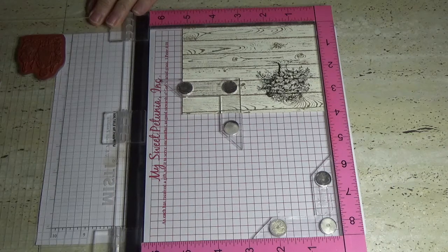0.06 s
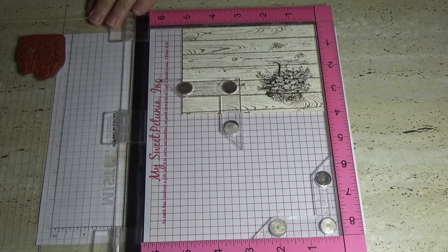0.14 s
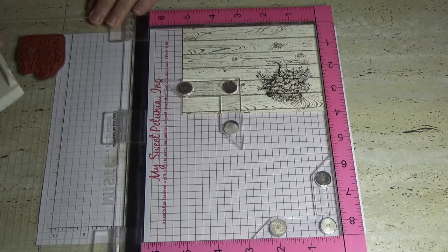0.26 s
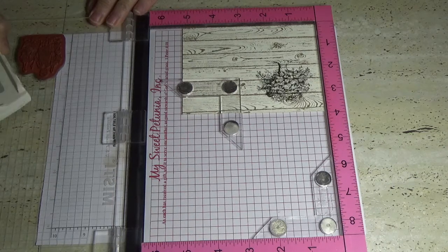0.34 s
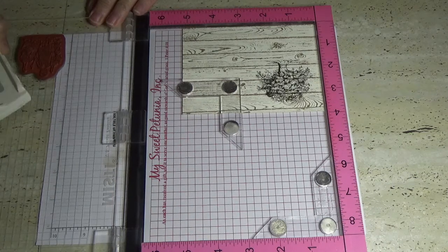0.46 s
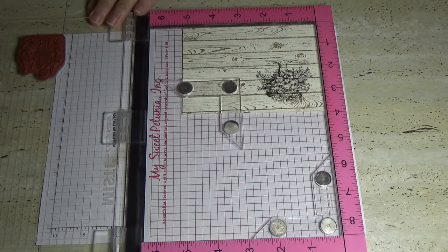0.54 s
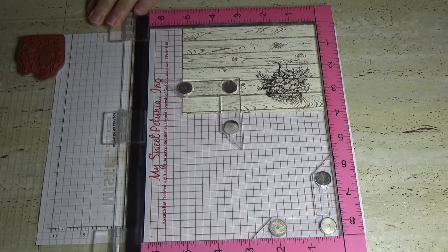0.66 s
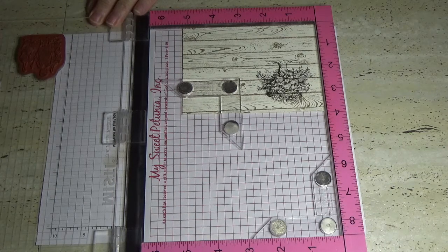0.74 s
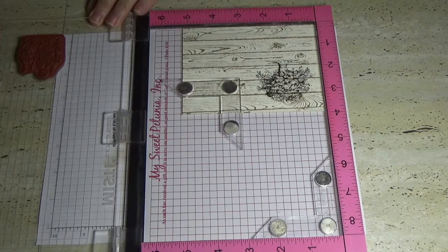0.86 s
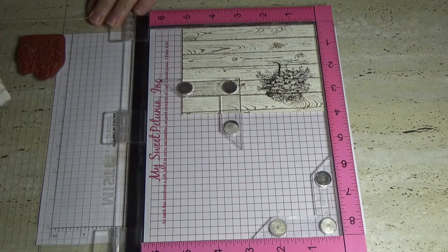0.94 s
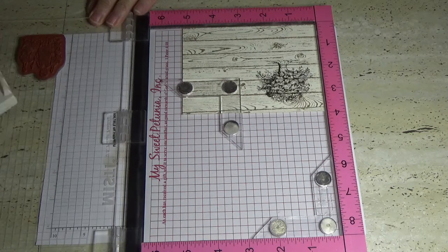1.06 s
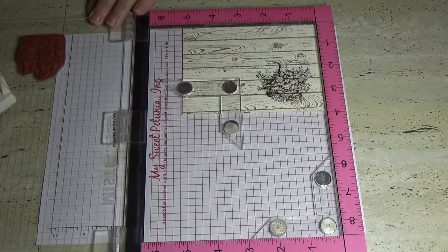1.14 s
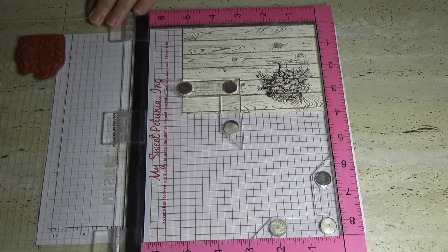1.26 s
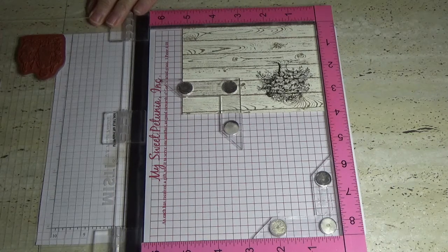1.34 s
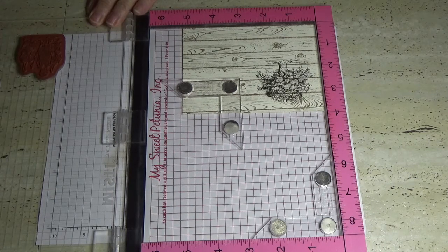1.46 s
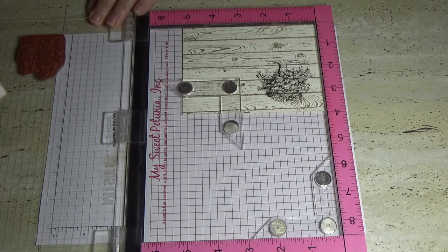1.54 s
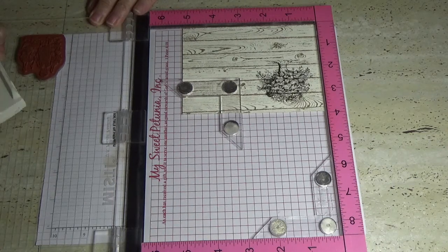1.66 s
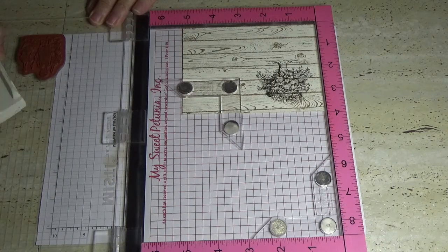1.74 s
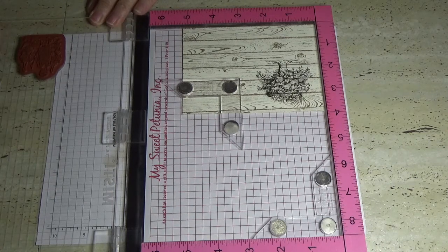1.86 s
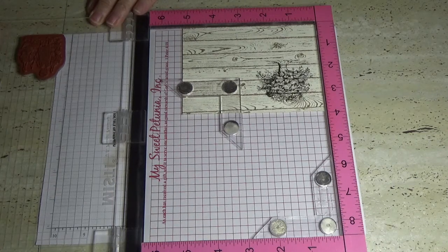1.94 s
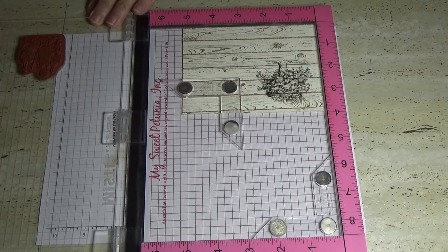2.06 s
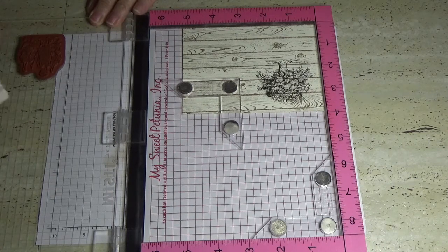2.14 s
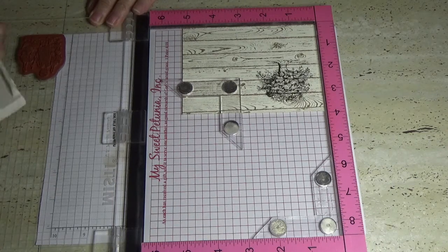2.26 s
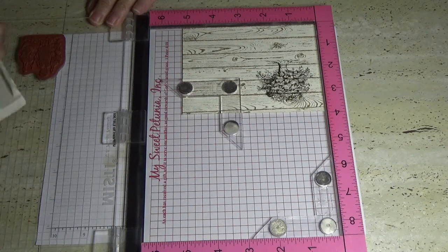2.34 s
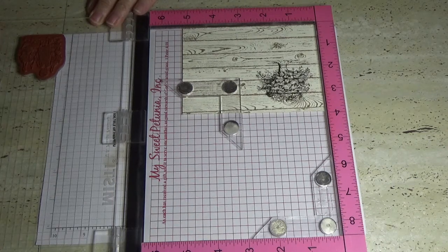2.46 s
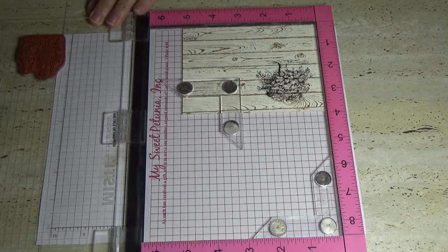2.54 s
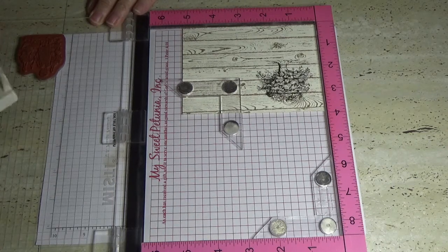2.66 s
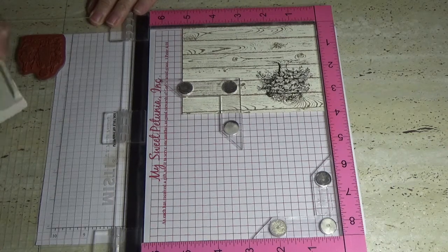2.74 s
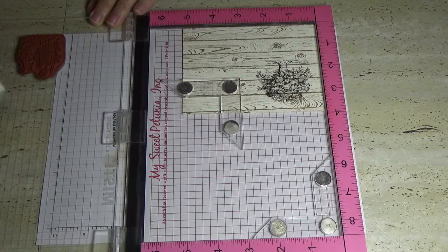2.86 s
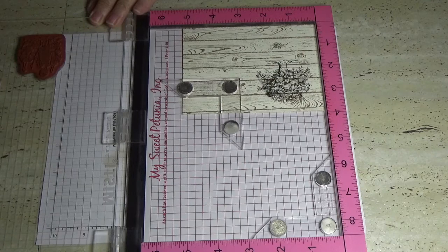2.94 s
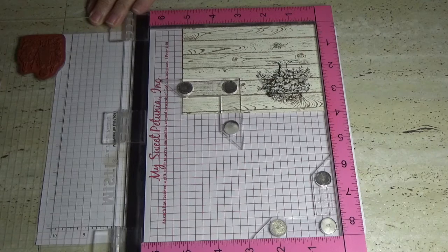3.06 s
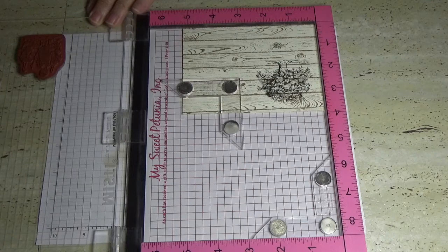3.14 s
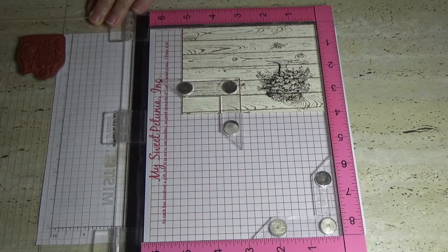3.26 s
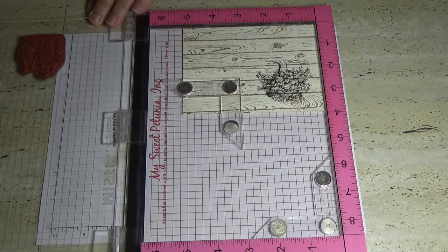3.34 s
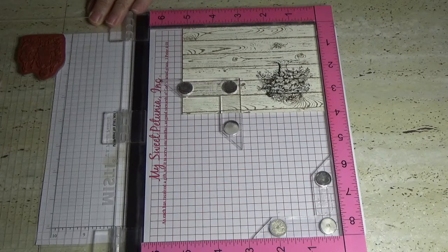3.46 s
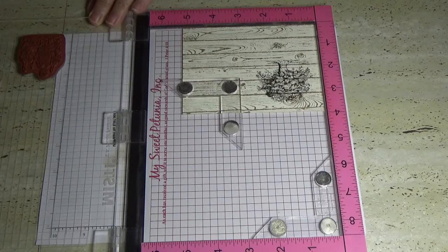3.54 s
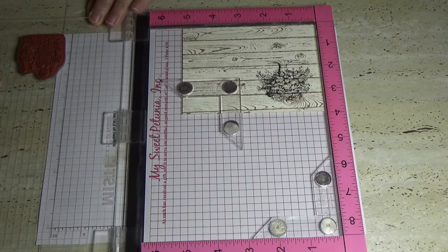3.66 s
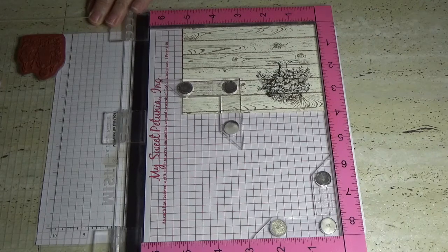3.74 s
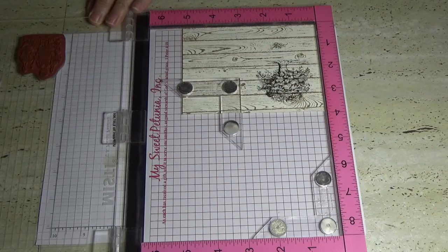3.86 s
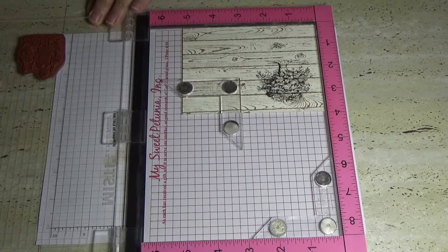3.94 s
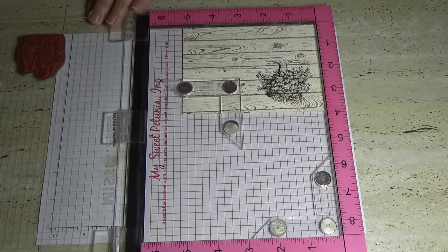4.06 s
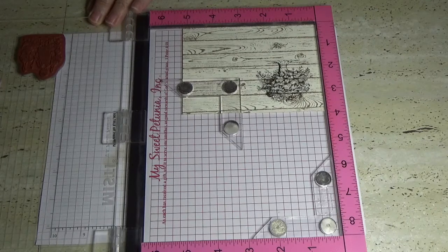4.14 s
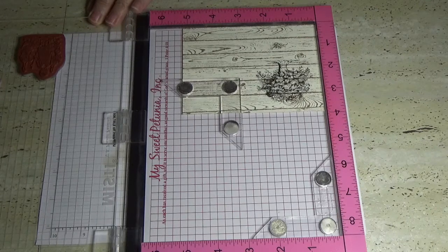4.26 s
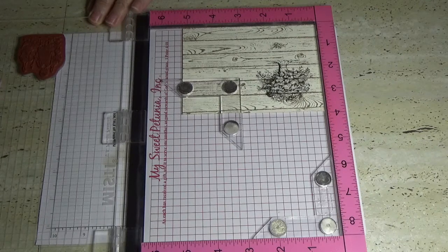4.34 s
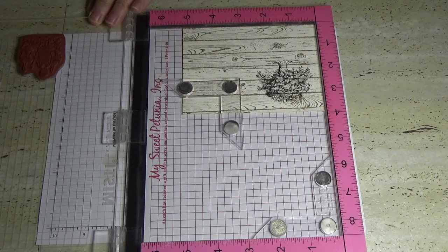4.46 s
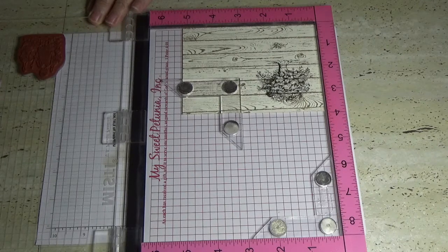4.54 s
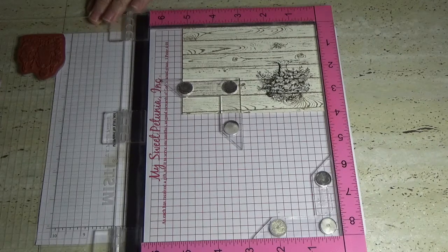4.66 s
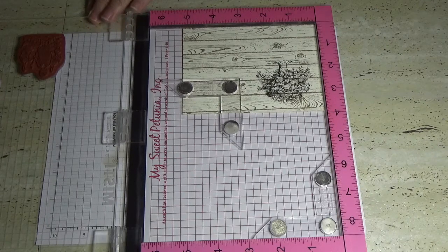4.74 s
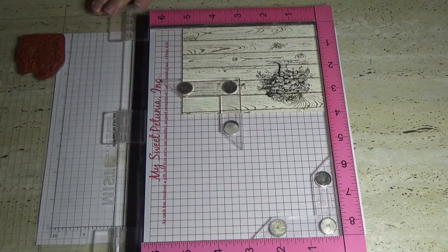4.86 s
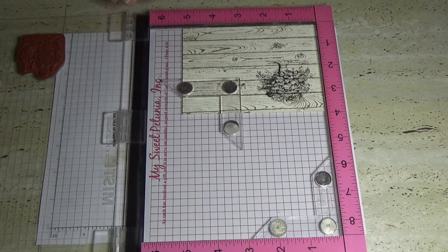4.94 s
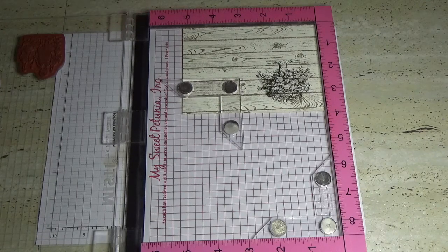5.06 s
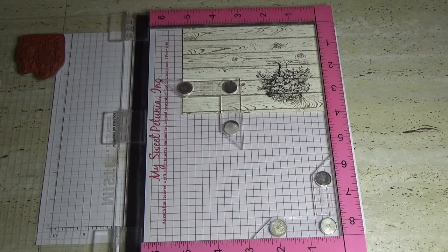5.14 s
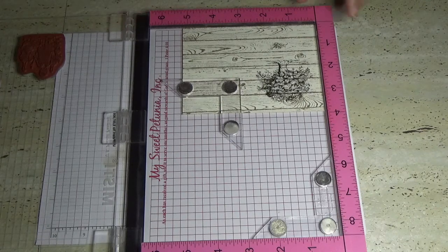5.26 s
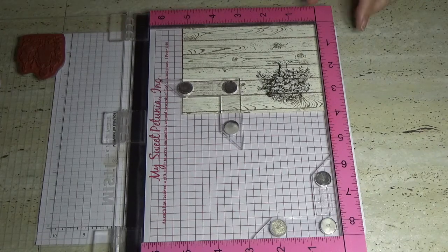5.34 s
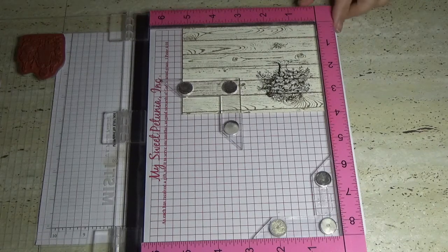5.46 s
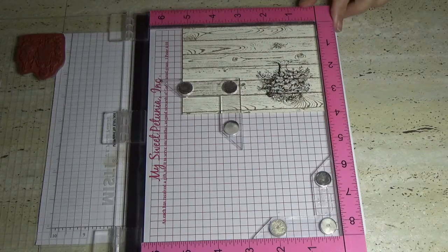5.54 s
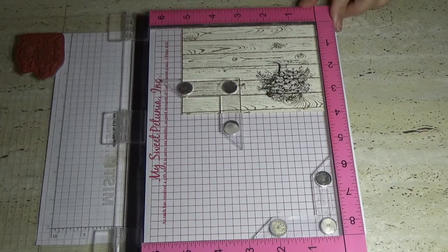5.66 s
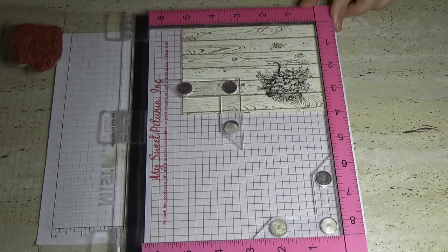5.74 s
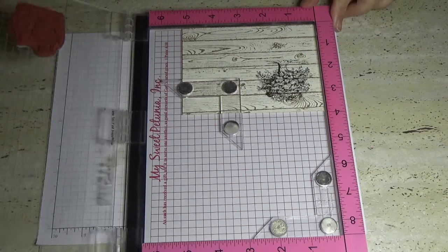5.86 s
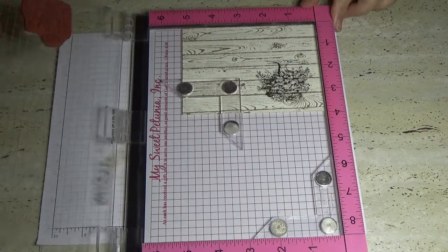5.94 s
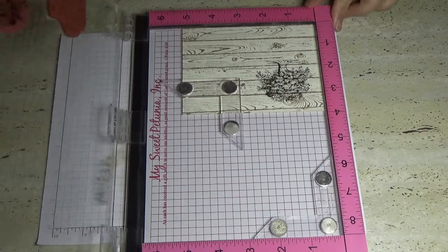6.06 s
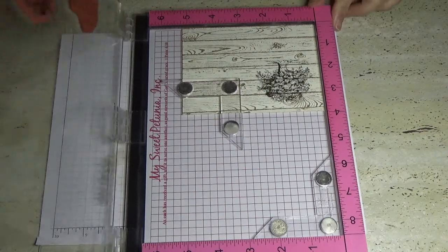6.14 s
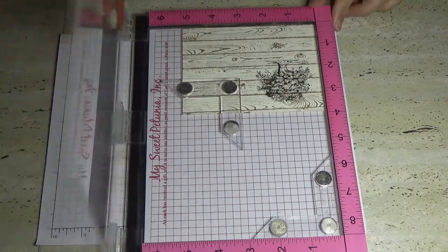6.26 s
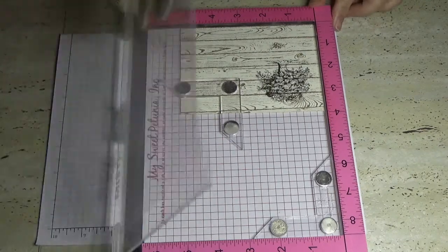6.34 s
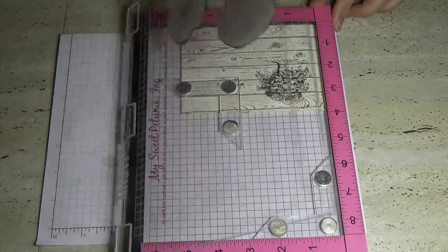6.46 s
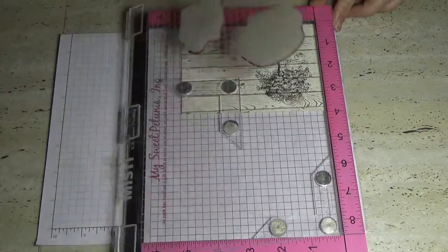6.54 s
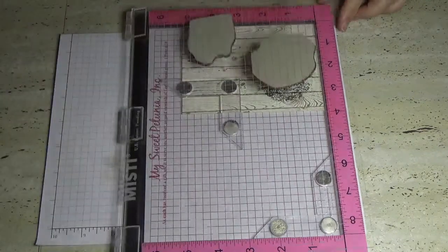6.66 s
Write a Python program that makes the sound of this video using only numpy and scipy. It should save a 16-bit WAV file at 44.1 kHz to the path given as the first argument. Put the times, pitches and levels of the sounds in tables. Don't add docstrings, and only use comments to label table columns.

```python
import sys
import numpy as np
from scipy import signal
from scipy.io import wavfile

SR = 44100
rng = np.random.default_rng(int(sys.argv[2]) if len(sys.argv) > 2 else 0)


def invert_db(level):
    return 10 ** (np.asarray(level, dtype=float) / 20)


def transcribe(u):
    v = np.clip(np.atleast_2d(u).T, -1, 1)
    q = np.round(v * 32767).astype(np.int16)
    wavfile.write(sys.argv[1], SR, q)


N = 295911

# t/s, peak level/dB, hollow f/Hz, case level/dB and crack level/dB (both re peak)
SLAPS = [
    (0.345, -19, 1053, 5, 8.5),
    (1.003, -19, 957, 10, 6),
    (1.633, -12.5, 1038, -11, 1.5),
    (2.225, -15, 1087, 5, 6.5),
    (2.731, -16.5, 1030, 5, 5.5),
]
PULLS = [
    (0.518, -21, 1166, 0.5, -2),
    (1.165, -23.5, 1100, -3, -1.5),
    (1.809, -19, 1110, -3.5, -5),
    (2.389, -35, 1050, -17, -22),
    (2.398, -27.5, 1184, -6.5, -7),
    (2.828, -26.5, 1074, 1.5, -2),
    (3.421, -23, 837, -13, -8.5),
]
DROPS = [
    (0.693, -36.5, 1337, 1.8, -1),
    (1.391, -35.5, 1333, 1.5, -2.5),
]
# f/Hz, level/dB, t60/s
CASE_MODES = [(1890, -6.5, 0.0031), (2830, -6, 0.0053)]
# f/Hz, level/dB, t60/s
RIM_MODES = [(3450, 73, 0.0038), (4450, -16, 0.014), (5100, -43, 0.0052)]


def pad():
    body, bright, spread = np.zeros((3, N))
    kinds = [(SLAPS, -14, -13.5), (PULLS, -74, -15.6), (DROPS, -15.5, -13.5)]
    for blows, thud_db, squeeze_db in kinds:
        for s, db, hollow_hz, case_db, crack_db in blows:
            touch = contact(click=14.0, rise_s=.0007, spread_s=.0012)
            slap = contact(click=2.5, rise_s=.0007, spread_s=.0035)
            scatter_db = rng.normal(0, 2.5, 6)
            top_hz = np.clip(6500 * invert_db(0.41 * (db + crack_db + 21.5)), 5200, 11000)

            blow = struck_body(touch, hollow_hz, case_db, thud_db, scatter_db[:2])
            add(body, s, invert_db(db + 2.5) * soft(blow, top_hz))
            add(body, s - .005, invert_db(db + squeeze_db) * squeezed_air(hollow_hz))

            rim = invert_db(-8) * peak_one(ring(touch, RIM_MODES, scatter_db[3:]))
            rough = crack(slap, low_hz=2400, high_hz=top_hz) + rim
            even = crack(touch, low_hz=2400, high_hz=top_hz) + rim
            add(bright, s, invert_db(db + crack_db - 2.0) * rough)
            add(spread, s, invert_db(db + crack_db - 2.5) * rms_one(even) * np.std(rough))
    return body, bright, spread


def struck_body(touch, hollow_hz, case_db, thud_db, scatter_db):
    hollow = [(0.56 * hollow_hz, -6, .011), (hollow_hz, 0, .022), (1.704 * hollow_hz, -7, .008)]
    clear_hz = 2405 * max(hollow_hz / 1050, 1) ** 0.16
    thud = [(257, 0.5, 0.0078), (348, -5.5, 0.04), (612, -19.5, 0.048)]
    blow = peak_one(ring(touch, hollow))
    blow += invert_db(-4) * peak_one(ring(touch, CASE_MODES, scatter_db))
    blow += invert_db(case_db - 6.0) * peak_one(ring(touch, [(clear_hz, 0, 0.016)]))
    blow += invert_db(thud_db) * peak_one(ring(touch, thud))
    return blow


def squeezed_air(hollow_hz):
    flow = rng.standard_normal(220) * np.linspace(0, 1, 220)
    return peak_one(ring(flow, [(hollow_hz, 0, .006), (3.3 * hollow_hz, -4, .003)]))


# t/s, peak level/dB of the low pair, level/dB of the upper pair (re low)
BOOMS = [
    (0.346, -46, 4),
    (1.005, -43, 3.5),
    (1.632, -36.5, -3),
    (2.224, -41, -11),
    (2.733, -36.5, 5),
    (4.579, -57.5, 4.5),
    (5.15, -57.5, 13),
    (5.374, -63.5, 8),
]
# f/Hz, level/dB, t60/s
TABLE_LOW_MODES = [(58, 0, .5), (70, -1, .45)]
# f/Hz, level/dB, t60/s
TABLE_UPPER_MODES = [(136, 0, .22), (150, -3, .22)]


def table():
    out, push = np.zeros(N), np.zeros(SR)
    push[:200] = np.hanning(200) / 100
    for s, db, upper_db in BOOMS:
        low = ring(push, TABLE_LOW_MODES)
        upper = invert_db(upper_db + 4.0) * ring(push, TABLE_UPPER_MODES)
        add(out, s, invert_db(db - 1.5) * (low + upper))
    return out


# start t/s, slip rate f/Hz at start, at end, level/dB at start, at end
SLIPS = [
    (5.9270, 400, 340, -38, -41),
    (5.9576, 193, 192, -32, -32),
    (6.0302, 192, 190, -32, -38),
    (6.0896, 125, 228, -30, -33),
    (6.1599, 150, 150, -22, -22),
    (6.1663, 185, 222, -31, -33),
    (6.2048, 360, 520, -39, -41),
    (6.2846, 370, 360, -34, -38),
    (6.336, 330, 300, -42, -49),
]
# t/s, panel load level/dB, pin grip level/dB
SWING = [
    (5.927, -2, 5.5),
    (5.96, 1, 3),
    (6.0, -4.5, -1),
    (6.08, -1.5, -2),
    (6.2, -11, -6),
    (6.25, -4, -10),
    (6.28, -9.5, 1),
    (6.36, 2, -11),
    (6.4, -3, -20),
]
# f/Hz, level/dB, t60/s
HINGE_MODES = [(1110, -23, 0.067), (1870, -11.5, 0.028), (2520, -15, 0.011), (3770, 0, 0.0052),
               (4130, -8.5, 0.027), (4880, 6.5, 0.0033)]
# f/Hz, level/dB, t60/s
PIN_MODES = [(7400, 2, 0.00087), (9800, 11.5, 0.0017)]


def hinge():
    swing_start_s, swing_end_s, catch_s = SLIPS[0][0], 6.387, .002
    slips = np.zeros(N)
    ends_s = [run[0] for run in SLIPS[1:]] + [swing_end_s]
    for (start, rate0, rate1, db0, db1), end in zip(SLIPS, ends_s):
        size = round((end - catch_s - start) * SR)
        uneven = 1 + (rate0 > 300) * 2.0 * rng.standard_normal(size)
        cycles = np.cumsum(np.linspace(rate0, rate1, size) * uneven) / SR
        count = np.maximum.accumulate(np.floor(cycles))
        add(slips, start, np.diff(count, prepend=-1) * np.linspace(invert_db(db0), invert_db(db1), size))
    slips *= invert_db(.8 * rng.standard_normal(N))
    slips += signal.lfilter([.06], [1, -.96], slips) * rng.standard_normal(N)

    load_db, grip_db = in_time(SWING)
    since = np.clip(np.arange(N) / SR, swing_start_s, swing_end_s) - swing_start_s
    panel_hz = np.clip(722 - 1400 * (since - 0.15), 474, 722)
    leaf_hz = 6110 - 2700 * since
    kicks = np.diff(slips, prepend=0)
    metal = ring(slips, HINGE_MODES) + invert_db(grip_db) * ring(slips, PIN_MODES)
    metal += invert_db(-3.0) * gliding(kicks, leaf_hz, t60=0.011)
    panel = invert_db(load_db + 11.5) * gliding(kicks, panel_hz, t60=0.016)
    return invert_db(-5.5) * metal + panel


# t/s, ring peak level/dB, ring
# f/Hz, crack level/dB, thud level/dB
CLICKS = [(3.103, -59, 820, -58, -75), (4, -54.5, 900, -68, -74), (4.58, -34, 860, -93, -56.5),
          (4.6, -53, 860, -87, -50), (4.768, -48, 1310, -41.5, -69), (4.842, -76, 1380, -51.5, -79),
          (5.163, -48, 690, -42, -47), (5.375, -34, 2040, -53.5, -60), (5.579, -69, 762, -49.5, -67),
          (5.679, -44, 1650, -39.5, -79), (5.694, -72, 1160, -45, -73.5), (5.711, -49, 1560, -40, -79),
          (5.72, -37.5, 1640, -49, -58), (6.565, -70, 762, -65, -60), (6.7, -46, 1520, -67, -70),
          (1.36, -52, 1620, -75, -60),
    (2.218, -32, 1080, -55, -53),
    (5.152, -59, 620, -75, -43.5),
    (5.252, -70, 700, -80, -72),
    (5.381, -49, 1000, -50, -54),
    (5.716, -44, 1530, -48, -60),
    (5.73, -53, 1000, -53, -70),
    (6.16, -69, 600, -76, -57),
    (5.956, -42, 630, -80, -61),
]


def clicks():
    body, bright = np.zeros((2, N))
    thud = [(201.0, 2, 0.063), (324.7, -4.5, 0.064), (519.4, 1.5, 0.025)]
    for s, db, hz, crack_db, thud_db in CLICKS:
        low_hz, crack_hz = (4770, 6800) if crack_db - db > 18 else (1760, 4230)
        touch = contact(click=2.2, rise_s=.0002, spread_s=0.0043)
        broad = [(.55 * hz, -4, .012), (hz, 0, .008), (1.6 * hz, -2, .004)]
        add(body, s, invert_db(db + 1.0) * peak_one(soft(ring(touch, broad), top_hz=9.0 * hz)))
        add(body, s, invert_db(thud_db + 4.0) * peak_one(soft(ring(touch, thud), top_hz=1200)))
        brief = touch * np.exp(-np.arange(len(touch)) / SR / 0.006)
        add(bright, s, invert_db(crack_db + 9) * crack(brief, low_hz, high_hz=min(2.02 * crack_hz, 13000)))
    return body, bright, invert_db(-2.5) * bright


# f/Hz, t60/s, level/dB, left-right likeness/1
ROOM = [(140, 0.78, 0, 0.93), (417, 0.27, 3.5, 0.9), (1000, 0.26, 8.5, 0.81), (2470, 0.33, 1, 0.53),
        (5130, 0.37, 2.5, 0.51), (9800, 0.33, 2.5, 0.7)]


def room(x):
    t = np.arange(SR // 2) / SR

    def decay(hz):
        gain = invert_db(at_hz(ROOM, hz, order=2) - 60 * t / at_hz(ROOM, hz))
        return gain, at_hz(ROOM, hz, order=3)

    tail = bands(len(t), decay)
    tail *= 1 - np.exp(-(t / .005) ** 2)
    tail /= np.sqrt(np.sum(tail ** 2) / 2)
    return invert_db(-5) * signal.fftconvolve(tail, x[None], axes=1)[:, :N]


# f/Hz, level/dB
HISS = [(20, -11.5), (48, -5), (213, -7), (945, -10), (1610, -13), (3670, -19), (7750, -24.5),
        (11000, -22.5)]
# f/Hz, left-right likeness/1
LIKENESS = [(60, 1), (220, 0.68), (840, 0.05), (3140, 0.4), (11700, 0.83)]
# middle t/s, length t/s, hiss swell level/dB
RUSTLE = [
    (3.15, 0.31, 2),
    (3.75, 0.99, 2),
    (4.2, 0.28, 4.5),
    (4.8, 0.59, 0.5),
    (6.7, 1, 2),
]
# middle t/s, length t/s, level/dB above its rest
HUM = [(0.05, 0.64, 8), (0.72, 0.58, 9.5), (1.05, 0.16, 15), (1.5, 0.65, 7.5), (2.05, 1, 7.5),
       (2.87, .45, 14), (3.55, .9, 5), (4.35, 0.71, 8), (5.2, 0.74, 2), (5.8, 0.22, 2), (6.45, 0.28, 7)]


def background():
    high_db = swells(RUSTLE)
    low_db = 0.65 * high_db

    def shape(hz):
        share = np.clip(np.log2(hz / 1500) / 2, 0, 1)
        swell_db = (1 - share) * low_db * min(hz / 400, 1) + share * high_db
        return invert_db(at_hz(HISS, hz) + swell_db), at_hz(LIKENESS, hz)

    hum_hz, hum_rest_db, hiss_db = 103.3, -75.5, -62
    tone = np.sqrt(2) * np.sin(2 * np.pi * hum_hz * np.arange(N) / SR)
    return invert_db(hiss_db) * rms_one(bands(N, shape)) + invert_db(hum_rest_db + swells(HUM)) * tone


def ring(clicks, modes, scatter_db=0.):
    out = 0
    for k, (hz, db, t60) in enumerate(modes):
        r, w = invert_db(-60 / (t60 * SR)), 2 * np.pi * hz / SR
        gain = (-1) ** k * invert_db(db + np.take(scatter_db, k, mode="wrap")) / 2
        out = out + signal.lfilter([gain, 0, -gain], [1, -2 * r * np.cos(w), r * r], clicks + 1e-18)
    return out


def gliding(clicks, hz, t60):
    turn = np.exp(2j * np.pi * np.cumsum(hz) / SR)
    return np.real(turn * signal.lfilter([1], [1, -invert_db(-60 / (t60 * SR))], clicks * np.conj(turn)))


def contact(click, rise_s, spread_s):
    t = np.arange(3000) / SR
    burst = rng.standard_normal(len(t)) * (1 - np.exp(-t / rise_s)) * np.exp(-t / spread_s)
    burst[round(rise_s * SR)] += click
    return burst


def crack(touch, low_hz, high_hz):
    band = signal.butter(2, [low_hz, high_hz], "band", fs=SR, output="sos")
    return peak_one(signal.sosfilt(band, touch))


def soft(x, top_hz):
    return signal.sosfilt(signal.butter(2, min(top_hz, 15000), fs=SR, output="sos"), x)


def bands(size, shape):
    out, edges = 0, 18 * 2 ** np.arange(0, 10, .5)
    white = rng.standard_normal((2, 2, size))
    for k, (low, high) in enumerate(zip(edges, edges[1:])):
        band = signal.butter(2, [low, high], "band", fs=SR, output="sos")
        mid, side = signal.sosfilt(band, white[k % 2])
        gain, alike = shape(np.sqrt(low * high))
        alike = np.clip(alike, -1, 1)
        out = out + gain * (np.sqrt(1 + alike) * mid + np.sqrt(1 - alike) * side * [[1], [-1]])
    return out


def swells(rows):
    t = np.arange(N) / SR
    return np.max([db * np.cos(np.pi * np.clip((t - s) / length, -.5, .5)) for s, length, db in rows], axis=0)


def in_time(rows):
    s, *columns = np.transpose(rows)
    return [np.interp(np.arange(N) / SR, s, c) for c in columns]


def at_hz(points, hz, order=1):
    return np.interp(np.log(hz), np.log(np.array(points)[:, 0]), np.array(points)[:, order])


def rms_one(x):
    return x / np.sqrt(np.mean(x ** 2) + 1e-20)


def peak_one(x):
    return x / np.max(np.abs(x))


def add(track, s, sound):
    at = round(s * SR)
    track[at:at + len(sound)] += sound[:N - at]


def scene():
    body, bright, spread = np.add(pad(), clicks())
    creak = hinge()
    sent = body + spread + invert_db(-3) * creak
    direct = body * invert_db([[.3], [-.3]]) + bright * invert_db([[1.8], [-1.8]]) + creak * invert_db([[.4], [-.4]])
    return direct + room(sent) + table() + background()


def top_cut(x):
    return signal.sosfilt(signal.butter(12, 12330, fs=SR, output="sos"), x)


def record(dry):
    low_pass = signal.cheby2(14, 32, 11200, fs=SR, output="sos")
    mix = signal.sosfilt(low_pass, dry)
    return top_cut(mix)


dry = scene()
out = record(dry)
transcribe(out)
```